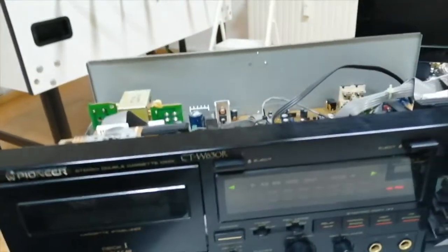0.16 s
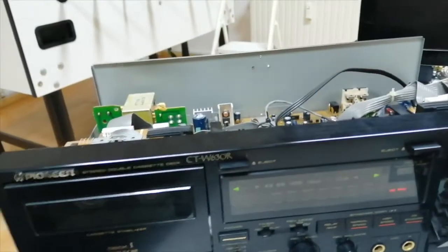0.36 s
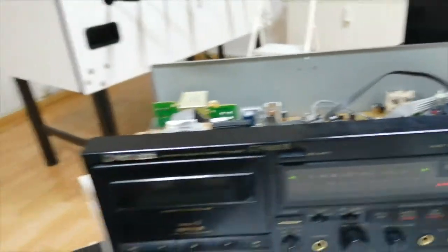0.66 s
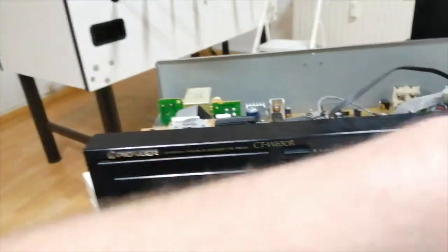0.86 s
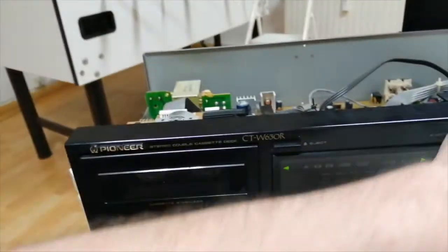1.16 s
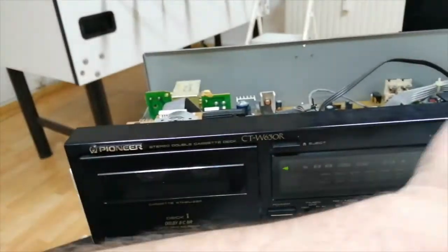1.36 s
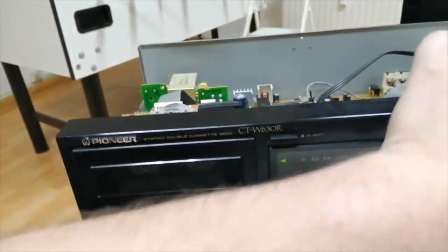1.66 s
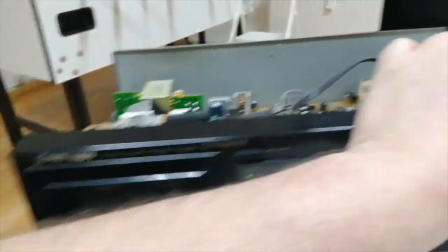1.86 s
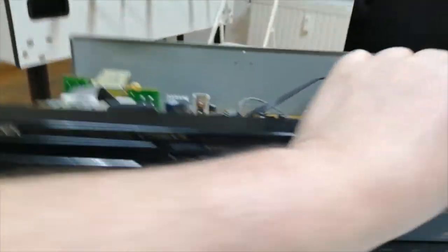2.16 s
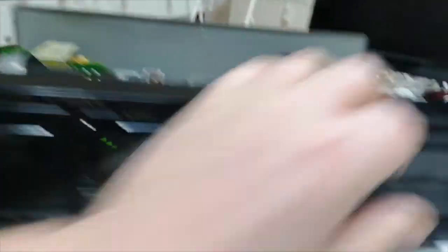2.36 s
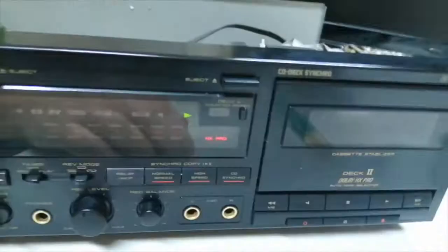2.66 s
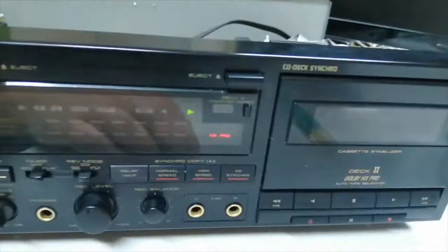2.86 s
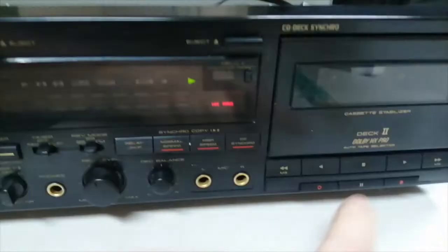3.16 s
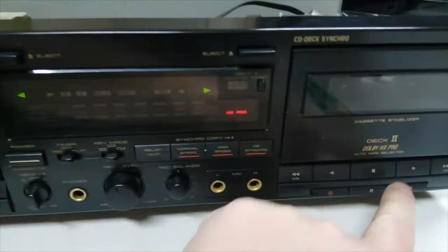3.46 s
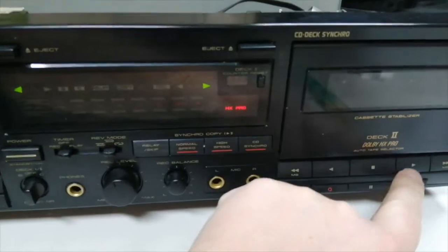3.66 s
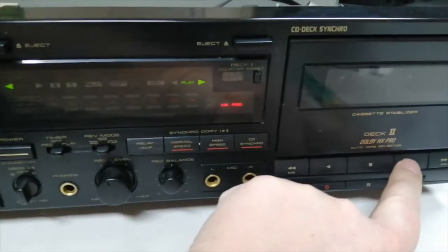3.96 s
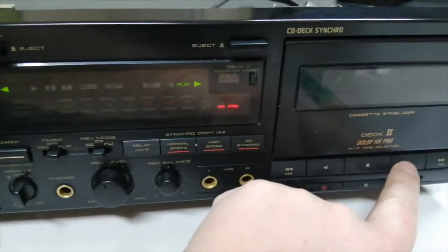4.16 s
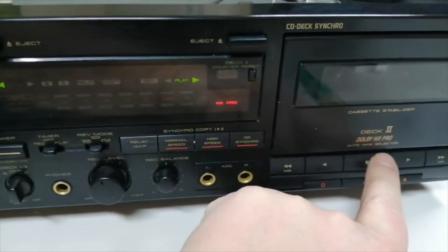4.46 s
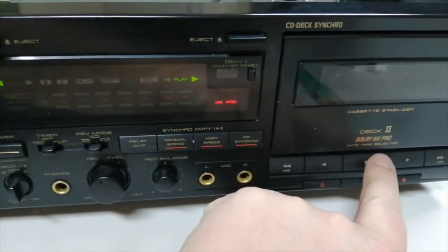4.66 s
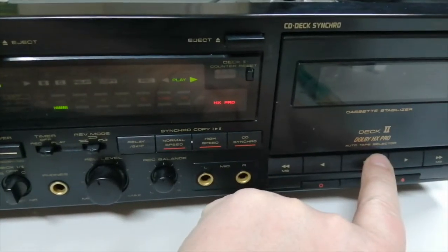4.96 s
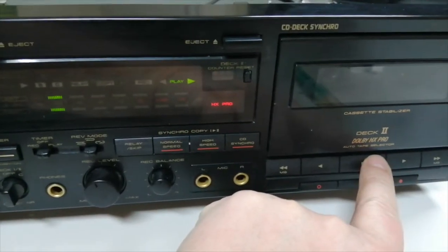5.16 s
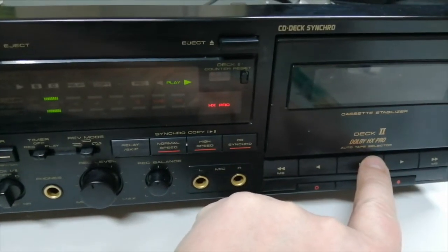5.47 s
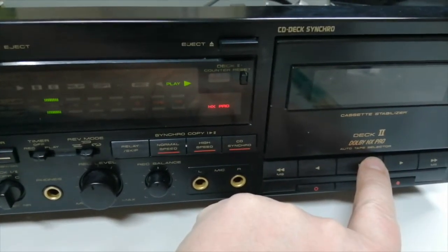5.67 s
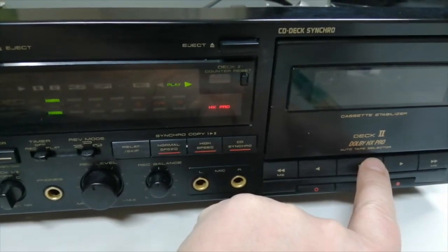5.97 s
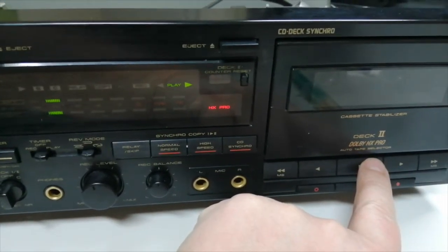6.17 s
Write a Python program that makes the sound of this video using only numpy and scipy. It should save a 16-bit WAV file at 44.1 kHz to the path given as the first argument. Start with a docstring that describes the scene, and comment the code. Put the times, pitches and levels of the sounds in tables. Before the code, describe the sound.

Close to a phone microphone in a bare room, plastic rubs on plastic and latches clack as a cassette is pushed into a deck and the door is closed, with small squeaks and soft knocks. A quieter stretch leads to a run of lighter button and lever clicks, then patchy, hissy rustling over a barely audible hum. The sounds ring briefly in the room above quiet background noise.

```python
"""A bare room, close to a phone: a cassette is pushed into a tape deck, the door shut, the keys pressed.
Hand and case bump softly. Sliding plastic and the blows of latches, keys and levers ring the deck's
modes, with brief squeaks and ringing clacks. Near the end something rustles off to one side and a
faint hum swells. The room rings on for about a second over a quiet noise floor."""
import sys
import numpy as np
from scipy import signal
from scipy.fft import rfft, irfft
from scipy.io import wavfile
from scipy.ndimage import uniform_filter1d

SR = 44100
rng = np.random.default_rng(int(sys.argv[2]) if len(sys.argv) > 2 else 0)


def pcm_store(signal):
    """Save signal as 16-bit PCM."""
    levels = np.round(np.clip(np.atleast_2d(signal), -1, 1) * 32767)
    wavfile.write(sys.argv[1], SR, levels.astype(np.int16).T)


N = 278254


def amp(db):
    return 10 ** (np.asarray(db) / 20)


def unit_rms(x):
    return x / np.sqrt(np.mean(x ** 2, axis=-1, keepdims=True) + 1e-20)


def at_peak(sound, db):
    """Scales the loudest 3 ms to db RMS."""
    return sound * amp(db) / np.sqrt(uniform_filter1d(sound ** 2, 130).max())


def curve_at(points, hz):
    knots_hz, values = np.transpose(points)
    return np.interp(np.log(hz + 1), np.log(knots_hz + 1), values)


def add(mix, start_s, sound):
    part = mix[:, round(start_s * SR):][:, :sound.shape[1]]
    part += sound[:, :part.shape[1]]


def band(x, lo_hz, hi_hz, order=2):
    return signal.sosfilt(signal.butter(order, [lo_hz, hi_hz], "bandpass", fs=SR, output="sos"), x)


def resonate(x, hz, width_hz):
    """Unity-gain resonance; hz may glide."""
    carrier = np.exp(2j * np.pi * np.cumsum(hz * np.ones(x.shape[-1])) / SR)
    pole = np.exp(-np.pi * width_hz / SR)
    return 2 * (carrier * signal.lfilter([1 - pole], [1, -pole], x / carrier)).real


def narrow_noise(count, hz, width_hz):
    return resonate(resonate(rng.standard_normal(count), hz, width_hz), hz, width_hz)


def envelope(t, rise_s, t60_s):
    return (1 - np.exp(-(t / rise_s) ** 2)) * amp(-60 * t / t60_s)


def pan_gains(pan_db):
    """pan_db is left minus right."""
    return amp(np.array([pan_db / 2, -pan_db / 2]))


def place(pair, pan_db):
    """The farther microphone port hears a near sound weaker and later."""
    lag = int(np.clip(-1.4 * pan_db, -14, 14))
    return pan_gains(pan_db)[:, None] * np.array([np.roll(pair[0], lag), pair[1]])


# diffuse field: (frequency [Hz], left-right correlation [-1..1])
COHERENCE = [(60, 0.54), (180, 0.49), (550, 0.53), (1650, -0.04), (4970, 0.0), (15000, -0.41)]
def diffuse(pair):
    """Closely spaced ports hear a room alike in the bass."""
    count = pair.shape[1]
    shared = curve_at(COHERENCE, np.fft.rfftfreq(count, 1 / SR))
    left, right = rfft(pair)
    return irfft([left, shared * left + np.sqrt(1 - shared ** 2) * right], count)


# floor spectrum: (frequency [Hz], relative density [dB])
FLOOR_SPECTRUM = [(12, -30.5), (20, -9), (32, -19.5), (113, -13), (172, -12), (204, -14), (328, -20),
                  (410, -20), (1440, -22.5), (6910, -24), (7730, -32.5), (14700, -24.5), (16000, -28)]
def noise_floor(level_db=-71):
    """Steady diffuse noise, strongest in the bass."""
    spectrum = rfft(diffuse(rng.standard_normal((2, N))))
    spectrum *= amp(curve_at(FLOOR_SPECTRUM, np.fft.rfftfreq(N, 1 / SR)))
    return amp(level_db) * unit_rms(irfft(spectrum, N))


# hand and case: (time [s], peak [dB], pitch [Hz], t60 [s])
CASE_BUMPS = [(0.038, -53, 93, 0.27), (1.156, -49, 355, 0.13), (1.27, -37.5, 357, 0.25),
              (1.417, -51.5, 180, 0.45), (1.998, -57, 258.5, 0.23), (2.583, -54.5, 83.4, 0.24),
              (2.957, -64, 96.4, 0.2), (3.982, -57.5, 343, 0.36), (4.379, -58, 313, 0.35),
              (4.601, -49, 329, 0.15)]
def bumps():
    """Hand and case bump: a low dying wobble, nearly equal at both ports."""
    out, t = np.zeros((2, N)), np.arange(SR // 2) / SR
    for start_s, db, hz, t60_s in CASE_BUMPS:
        wobble = narrow_noise(len(t), hz, width_hz=220) * envelope(t, 0.003, t60_s)
        add(out, start_s, pan_gains(-2.5)[:, None] * at_peak(wobble, db))
    return out


# deck modes: (frequency [Hz], width [Hz], gain [dB])
DECK_MODES = [(337.5, 30, -12.5), (680, 40, -8.5), (980, 333, 8), (1722, 750, 6), (2800, 660, -0.5),
              (3200, 150, -2), (4580, 350, -11.5), (5370, 300, 2), (6850, 620, -8), (9720, 900, 2.5),
              (10650, 800, -2), (13400, 300, -12)]
def deck_ring(drive, contact_hz, bass_hz, bass_db, mid_db, treble_db, boost_db):
    """Plastic and sheet metal ring, most near the contact's two pitches. Band levels re 2.4-7.2 kHz."""
    ring = 0.44 * drive
    for hz, width_hz, db in DECK_MODES:
        nearness = np.exp(-(np.log(hz / contact_hz) / 0.09) ** 2)
        nearness += np.exp(-(np.log(hz / bass_hz) / 0.36) ** 2)
        ring += amp(db + boost_db * nearness) * resonate(drive, hz, width_hz)
    bands = [(330, 1300, bass_db), (1300, 2400, mid_db), (2400, 7200, 0), (7500, 16500, treble_db)]
    return sum(amp(db) * unit_rms(band(ring, lo_hz, hi_hz)) for lo_hz, hi_hz, db in bands)


def grains(count, per_s, spread_db, clump_db):
    """Uneven slips in clumps, partly shared by both ports."""
    clumps = amp(clump_db * unit_rms(uniform_filter1d(rng.standard_normal(count), 250)))
    sizes = amp(spread_db * np.minimum(rng.exponential(1, (3, count)), 4))
    slips = sizes * (rng.random((3, count)) < per_s / SR)
    slips *= rng.choice([-1., 1.], slips.shape)
    return clumps * (slips[:2] + 0.49 * slips[2])


# sliding strokes, one list each: (time [s], level [dB], pitch [Hz], bass [dB])
RUB_PATHS = [
    [(0.071, -41.5, 3180, 4), (0.175, -38.5, 3420, -4.5), (0.2, -54.5, 3280, 3)],
    [(0.2, -50, 3300, -5), (0.306, -39.5, 3550, 0.5), (0.335, -54, 3660, -3)],
    [(1.07, -46.5, 3710, -7), (1.146, -40, 3150, -11), (1.292, -30, 3710, -5), (1.36, -57, 3650, -6)],
    [(1.83, -53, 2990, -2.5), (1.838, -55, 3050, -19), (1.99, -37, 3380, -5.5)],
    [(2.9, -82, 5850, -17), (2.942, -54, 4540, -10.5), (3.05, -67.5, 4550, -0.5)],
    [(3.525, -68.5, 3430, -15), (3.567, -60.5, 3200, -21.5), (3.61, -83, 3130, -13)],
    [(3.65, -70.5, 3250, 1), (3.742, -60.5, 3230, -10), (3.76, -99, 3140, -3)],
    [(3.962, -64, 3590, -13), (3.972, -39.5, 3580, -5.5), (4.06, -67, 3440, -1)],
    [(4.19, -49.5, 2950, 4), (4.23, -70, 2960, -5)],
    [(4.365, -56, 4300, -5), (4.381, -43, 4250, -6), (4.43, -55, 3600, -3)],
    [(4.6, -43, 3440, -11), (4.612, -47.5, 3480, -7.5), (4.7, -71.5, 3700, -12)],
]
# one row per stroke: (pan [dB], bass pitch [Hz], mid [dB], treble [dB])
RUB_SETTINGS = [(-10, 560, -4.5, -19), (-12, 950, -3.5, -13), (-8.5, 560, -10.5, -18),
                (-6.5, 830, -13, -19.5), (4.5, 590, -10, -12.5), (0.5, 680, -17.5, -17.5),
                (0, 700, -11, -11), (3.5, 650, -4, -8), (2, 600, 0, -11), (1.5, 600, -9, -10.5),
                (1.5, 470, -14, -13)]
def rubs():
    """Plastic slides on plastic; stick-slip grains ring the deck."""
    out = np.zeros((2, N))
    for path, (pan_db, bass_hz, mid_db, treble_db) in zip(RUB_PATHS, RUB_SETTINGS):
        times_s, *columns = np.transpose(path)
        t = np.arange(times_s[0], times_s[-1], 1 / SR)
        db, hz, bass_db = (np.interp(t, times_s, column) for column in columns)
        slips = grains(len(t), per_s=3200, spread_db=4.0, clump_db=2.5)
        ring = deck_ring(slips, hz, bass_hz, bass_db, mid_db, treble_db, boost_db=9.5)
        add(out, times_s[0], place(amp(db) * ring * signal.windows.tukey(len(t), 0.05), pan_db))
    return out


# clicks of latches, keys and levers, plus a last tick that starts a burst of rustle:
# (time [s], peak [dB], pitch [Hz], bass pitch [Hz], bass [dB], mid [dB], treble [dB], pan [dB],
# rise [s], t60 [s], room send [dB])
CLICKS = [(0.1086, -41, 3050, 902, -24, -9, -10.5, -5, 0.0019, 0.027, 10.5),
          (0.164, -26.5, 2550, 1020, -20, -39, -21.5, -11.5, 0.0042, 0.027, 0.5),
          (0.3389, -19, 2300, 1030, -4.5, -13.5, -15.5, -4.5, 0.0047, 0.059, -4),
          (0.725, -39.5, 3200, 1070, -23, -27, -7, -7, 0.0017, 0.026, -2.5),
          (1.0243, -30, 3280, 1000, -35, -9.5, -30, -15, 0.0022, 0.013, -4),
          (1.0981, -37, 3644, 993, -26, -28, -21, -12, 0.0028, 0.017, -11),
          (1.1183, -25, 3450, 890, -9, -13, -22, -7, 0.00075, 0.026, -5),
          (1.2478, -28.5, 2930, 780, -11.5, -12, -22, -12.5, 0.0018, 0.026, -10),
          (1.28, -16, 3200, 361, -10.5, -8.5, -14.5, -6, 0.0021, 0.015, -4.5),
          (1.5525, -39.5, 3340, 810, -27, -20, -29, -5.5, 0.0012, 0.03, -1),
          (1.6686, -46, 3230, 1160, -1.5, -25, -17.5, -12.5, 0.0011, 0.056, 2),
          (1.8231, -43.5, 3670, 304, -5, -5, -22, -7, 0.00088, 0.035, 0),
          (1.8384, -34, 2920, 999, -15.5, -17, -27, -7.5, 0.0014, 0.028, -18),
          (1.9073, -42, 3540, 1200, -27, -40, -17, -0.5, 0.0026, 0.019, -15),
          (1.9264, -33, 4600, 1010, -6, -15, -38.5, -12, 0.002, 0.094, -24),
          (1.9435, -20.5, 3170, 980, -11, -9.5, -39, -12.5, 0.00073, 0.034, -18),
          (1.9843, -28, 4480, 850, -7, -7, -33, -8, 0.0059, 0.057, -7.5),
          (1.9949, -16.5, 5400, 942, -11, -12, -15, -5, 0.002, 0.026, -5.5),
          (3.8242, -42.5, 5020, 624, -22, -15.5, -14, 1, 0.0013, 0.028, -5),
          (3.9757, -28.5, 3700, 627, -15.5, -10, -12, -4, 0.0011, 0.024, -8),
          (4.1786, -33, 2780, 974, -34, -26, -16, -9.5, 0.00087, 0.028, -4),
          (4.368, -40, 6850, 483, -17, -14, -15, -0.5, 0.0017, 0.03, 3.5),
          (4.3828, -38.5, 2570, 980, -16, -17, 0, 2, 0.00067, 0.021, -8),
          (4.4775, -42, 2620, 350, -8, -3.5, -16, -2, 0.002, 0.029, -4.5),
          (4.578, -38, 2710, 1020, -24, -10, -19, -3.5, 0.0024, 0.024, -6),
          (4.5936, -30.5, 2570, 630, -8.5, -16.5, -18, -1.5, 0.0012, 0.026, -14),
          (5.9857, -55.5, 3320, 350, -30, -25, -44, 0, 0.00089, 0.035, -9)]
def clicks():
    """Brief rattling contacts ring the modes. Returns direct sound and room send."""
    direct, send, t = np.zeros((2, N)), np.zeros((2, N)), np.arange(4000) / SR
    impulse = np.tile(t == 0, (2, 1)) * 1.
    for start_s, db, *timbre, pan_db, rise_s, t60_s, send_db in CLICKS:
        chatter = rng.standard_normal((2, len(t))) * amp(3.5 * rng.standard_normal(len(t)))
        chatter *= envelope(t, rise_s, t60_s)
        click = at_peak(deck_ring(chatter, *timbre, boost_db=12.5), db)
        add(direct, start_s, place([click[0], 0.61 * click[0] + 0.6 * click[1]], pan_db))
        # rattle averages out over all directions: the room gets the plain ring
        ring = unit_rms(deck_ring(impulse, *timbre, boost_db=11.5))
        click_rms = np.sqrt(np.mean(click ** 2))
        add(send, start_s + rise_s, amp(send_db) * click_rms * ring)
    return direct, send


# single resonances: (time [s], peak [dB], pitch [Hz], width [Hz], rise [s], t60 [s], pan [dB])
PART_RINGS = [(0.164, -27.5, 1300, 900, 0.0024, 0.045, -7.5),
              (0.339, -23.5, 1990, 1340, 0.0008, 0.093, -7.5), (1.148, -30, 3165, 199.2, .003, .04, -8),
              (1.173, -35, 3050, 200, .004, .06, -8.5), (1.215, -36.5, 2790, 200, .004, .07, -7.5),
              (1.247, -27, 5180, 400, .003, .04, -5), (1.649, -52.5, 890, 60, .006, .1, -6),
              (1.842, -38, 3004, 121.5, .004, .08, -9), (1.995, -30, 889, 198, 0.0018, 0.035, -3.5),
              (3.53, -63, 3200, 500, .015, .3, 2.5), (1.997, -27, 9700, 332, .002, .03, -3.5)]
def part_rings():
    """Brief single resonances, from narrow squeaks to the broad ringing body of clacks."""
    out, t = np.zeros((2, N)), np.arange(9000) / SR
    for start_s, db, hz, width_hz, rise_s, t60_s, pan_db in PART_RINGS:
        ring = at_peak(narrow_noise(len(t), hz, width_hz) * envelope(t, rise_s, t60_s), db)
        add(out, start_s, place([ring, ring], pan_db))
    return out


# rustle: (time [s], level [dB], centre [Hz], pan [dB])
RUSTLE_PATH = [(4.8, -77, 3860, 2), (4.854, -63, 5900, 1), (4.888, -47, 6270, 5.5), (5.224, -77, 4720, -2),
               (5.304, -47.5, 5240, 3.5), (5.404, -55.5, 4600, -4), (5.526, -55.5, 4600, -1.0),
               (5.736, -78, 4940, 10.5), (5.786, -71.5, 5900, 6), (5.832, -58, 5400, 1.5),
               (5.942, -66, 3640, -1), (5.966, -70, 4400, 3), (6.008, -45, 4400, 1.5),
               (6.106, -48, 4800, -7), (6.19, -55, 4500, -5), (6.248, -66, 3570, -14),
               (6.31, -64.5, 5400, 19)]
def rustle():
    """Dense fine grains through a broad moving resonance, with faint skirts above and below."""
    times_s, *columns = np.transpose(RUSTLE_PATH)
    t = np.arange(times_s[0], times_s[-1], 1 / SR)
    db, hz, pan_db = (np.interp(t, times_s, column) for column in columns)
    fizz = grains(len(t), per_s=12000, spread_db=2.0, clump_db=1.1)
    core = unit_rms(band(resonate(fizz, hz, width_hz=1800) + 0.4 * fizz, 2660, 6750, order=3))
    skirts = amp(-21) * unit_rms(band(fizz, 7000, 12600)) + amp(-28.5) * unit_rms(band(fizz, 450, 1500))
    out = np.zeros((2, N))
    add(out, times_s[0], amp(db) * pan_gains(pan_db) * (core + skirts))
    return out


# hum: (time [s], pitch [Hz], level [dB])
HUM_PATH = [(5.0, 183.2, -103.5), (5.272, 180.8, -82.5), (5.48, 181.1, -98), (5.734, 179.7, -82),
            (6.31, 183.2, -73)]
def hum():
    """A faint low sine that swells near the end."""
    t = np.arange(N) / SR
    times_s, hz, db = np.transpose(HUM_PATH)
    phase = 2 * np.pi * np.cumsum(np.interp(t, times_s, hz)) / SR
    return np.sqrt(2) * amp(np.interp(t, times_s, db, left=-120)) * np.sin(phase)


# room decay: (frequency [Hz], t60 [s])
ROOM_T60 = [(100, 1), (400, 1), (1040, 1), (2760, 1), (7280, 0.92), (14000, 0.4)]
# tail colour: (frequency [Hz], gain [dB])
ROOM_EQ = [(100, 0.5), (500, -7.5), (1500, 2), (4000, -4), (8000, -1), (15000, 3)]
def room(send, build_s=0.002):
    """Dense reflections build up, then die away, fastest in the treble."""
    hz, t, noise = signal.stft(rng.standard_normal((2, SR)), SR, nperseg=256)
    decay_db = curve_at(ROOM_EQ, hz)[:, None] - 60 * t / curve_at(ROOM_T60, hz)[:, None]
    _, tail = signal.istft(noise * amp(decay_db), SR, nperseg=256)
    tail *= 1 - np.exp(-(np.arange(tail.shape[1]) / SR / build_s) ** 2)
    tail /= np.linalg.norm(tail[0])
    return diffuse(signal.fftconvolve(send, tail, axes=1)[:, :N])


def scene():
    """Direct sounds and their reverberation over floor and hum."""
    clicked, send = clicks()
    rubbed, rustled, rung, bumped = rubs(), rustle(), part_rings(), bumps()
    reverb = room(send + amp(-2.5) * bumped + amp(-3) * rubbed + amp(-6) * rung + amp(-5) * rustled)
    return noise_floor() + bumped + rubbed + clicked + rung + rustled + hum() + reverb


# port response: (frequency [Hz], gain [dB])
PORT_EQ = [(200, 3), (2000, -1.5), (7300, -6), (7900, -8.5), (15000, -0.5)]
# port resonances: (frequency [Hz], width [Hz], gain [dB])
PORT_MODES = [(3050, 316, 2.5), (4900, 370, 2), (6800, 1500, 4.5), (10300, 930, 2.5), (14800, 900, 0.5)]
# port mismatch: (frequency [Hz], left minus right [dB])
PORT_BALANCE = [(200, 3), (1000, 3.5), (2500, -4), (4400, -6), (8000, 13.5), (15000, -1)]
def record(dry, cutoff_hz=15700):
    """The phone's ports resonate, lose treble and differ in colour; a low-pass limits the band."""
    hz = np.fft.rfftfreq(N, 1 / SR)
    modes_db = sum(db / (1 + (2 * (hz - mode_hz) / width_hz) ** 2) for mode_hz, width_hz, db in PORT_MODES)
    response = amp(curve_at(PORT_EQ, hz) + modes_db) * pan_gains(curve_at(PORT_BALANCE, hz))
    heard = irfft(rfft(dry) * response, N)
    lowpass = signal.firwin(511, cutoff_hz, window=("kaiser", 9), fs=SR)
    return signal.oaconvolve(heard, lowpass[None], "same")


dry = scene()
out = record(dry)
pcm_store(out)
```